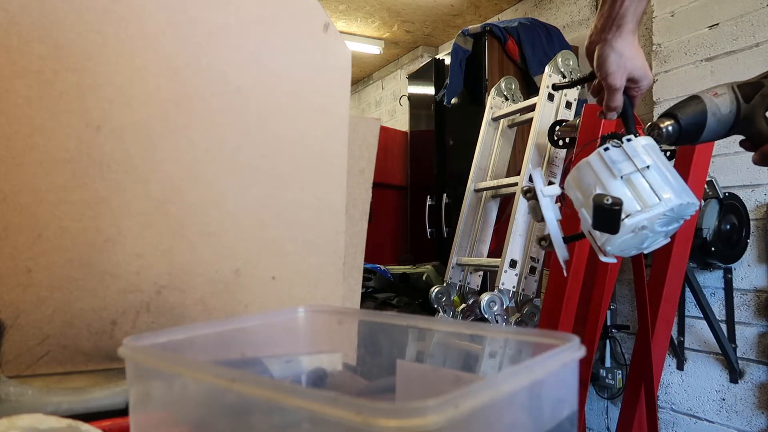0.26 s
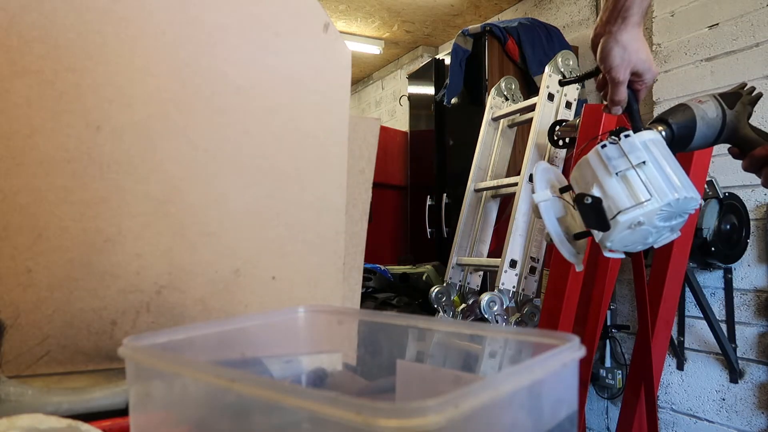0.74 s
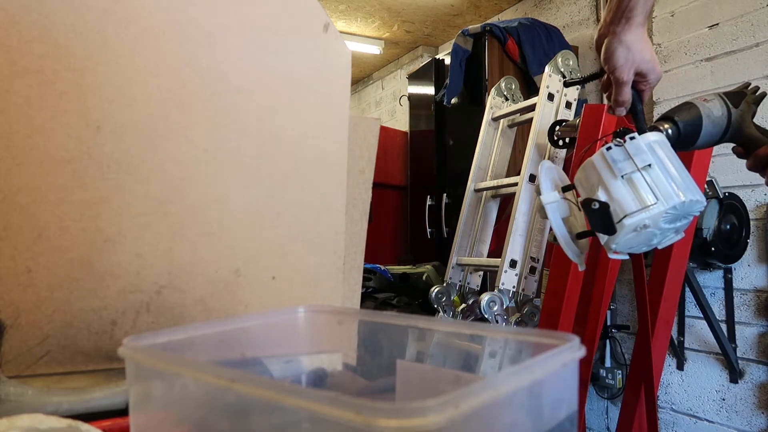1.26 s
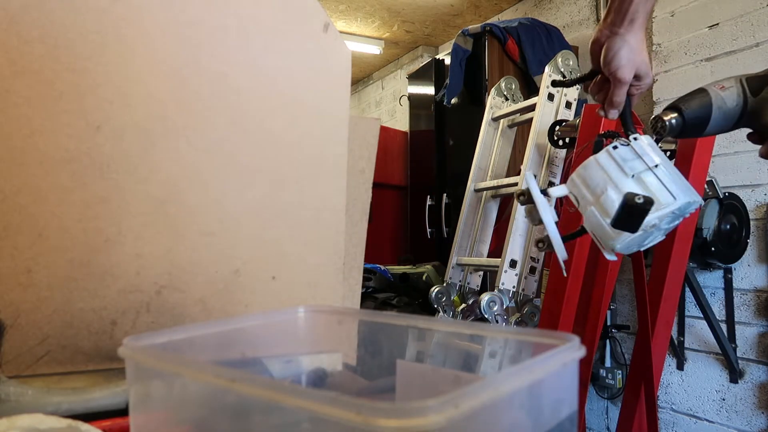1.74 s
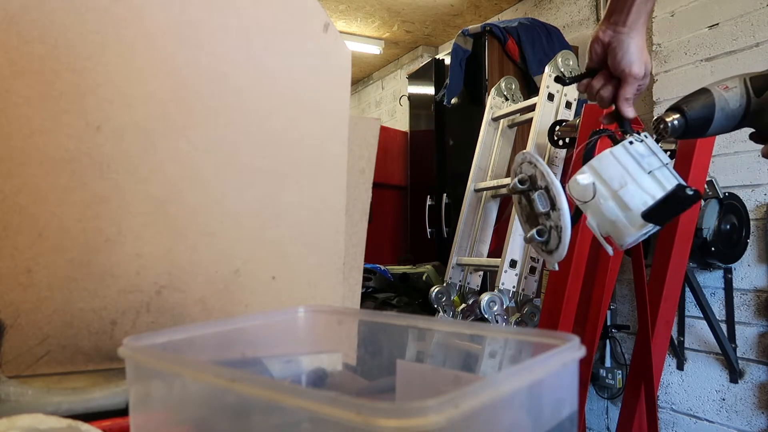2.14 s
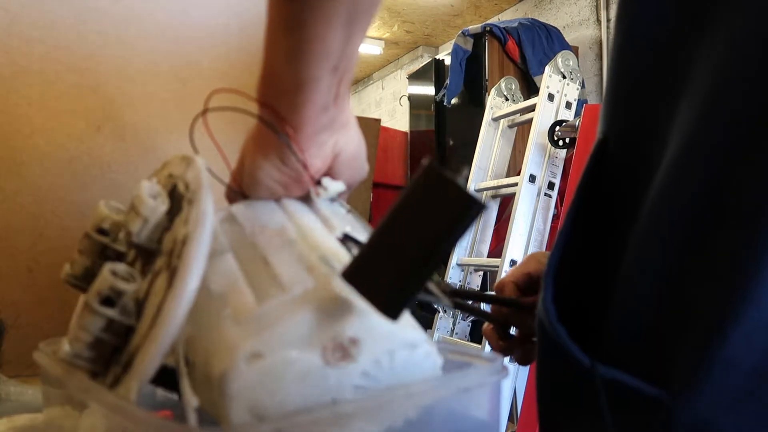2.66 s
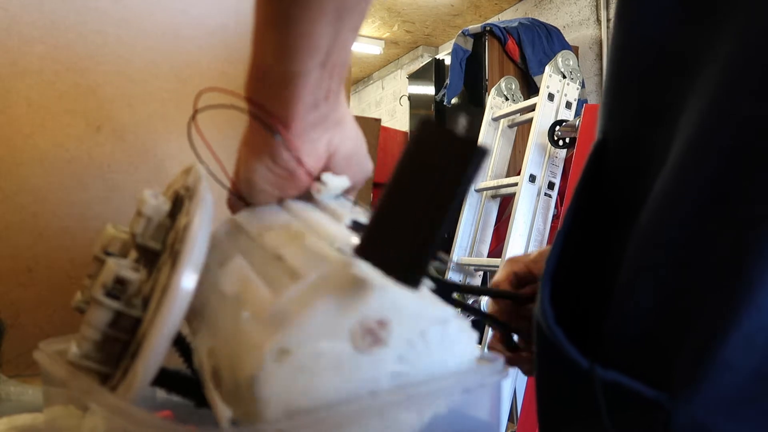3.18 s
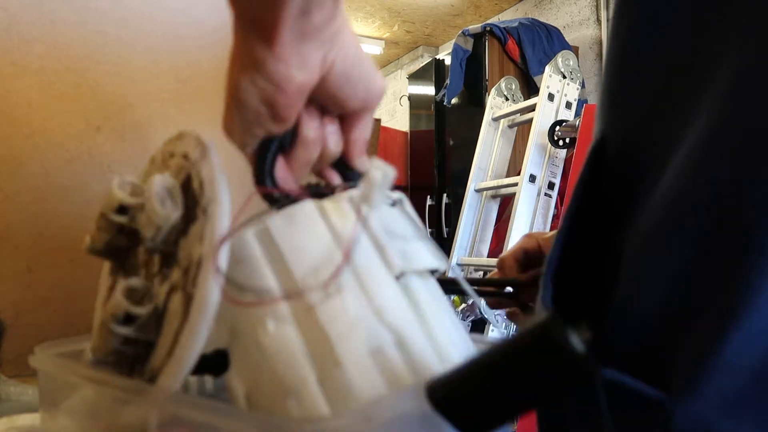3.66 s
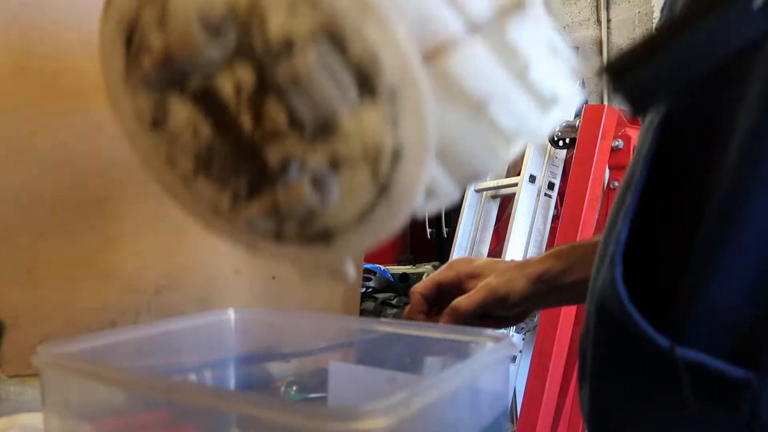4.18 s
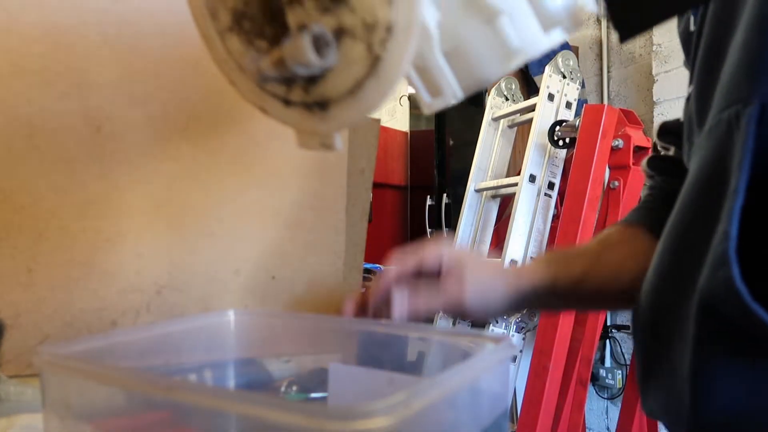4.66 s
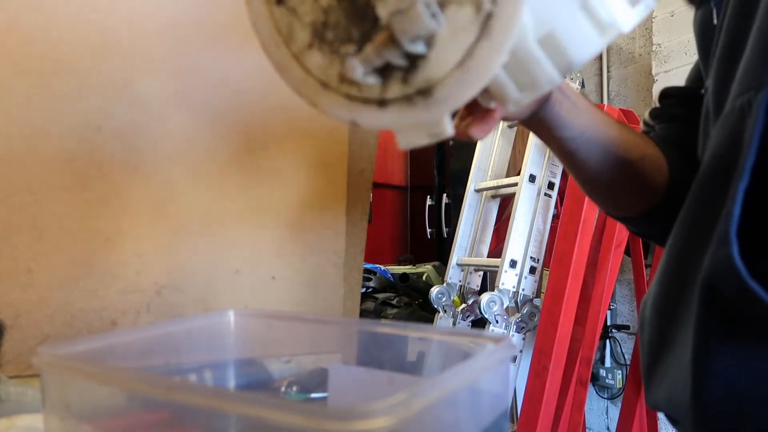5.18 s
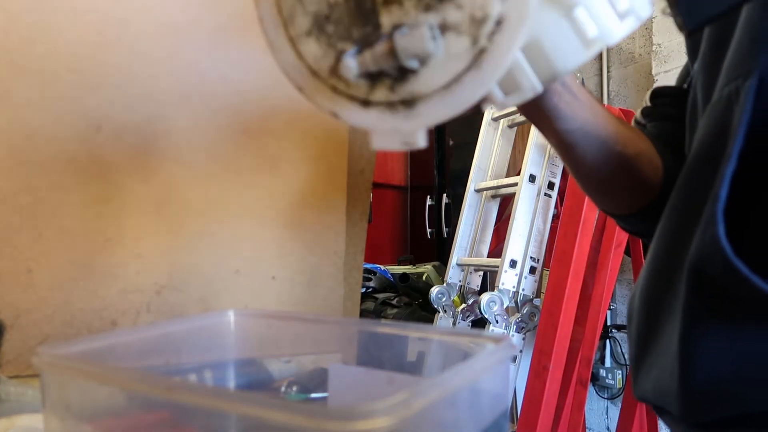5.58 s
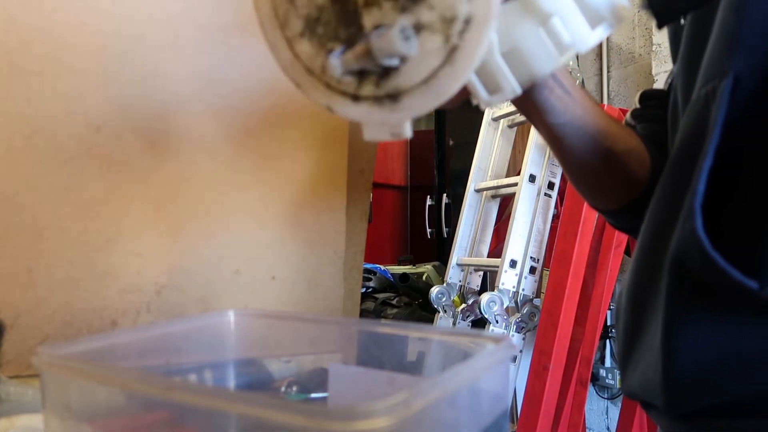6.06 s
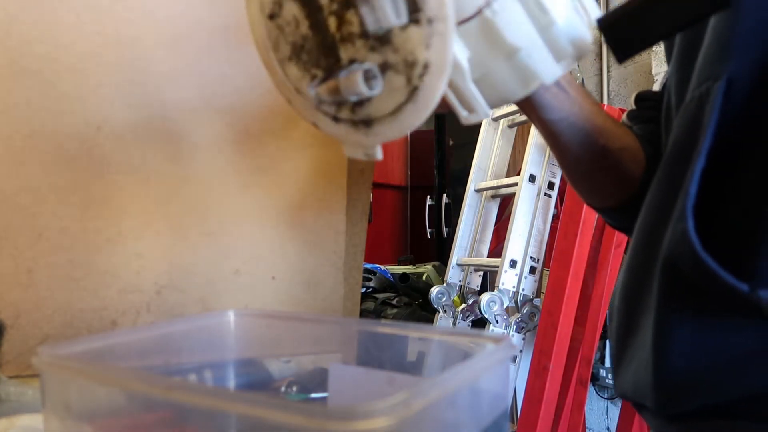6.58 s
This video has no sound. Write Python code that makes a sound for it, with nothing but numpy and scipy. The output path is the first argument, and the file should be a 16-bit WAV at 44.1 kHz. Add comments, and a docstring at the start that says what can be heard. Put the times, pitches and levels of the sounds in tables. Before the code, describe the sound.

From 0 to about 2.3 seconds a heat gun blows steadily: mid-heavy turbulent air coloured by nozzle resonances, with a thin, slightly wavering fan whine. It stops instantly with a hard cut. Immediately a hollow plastic part is handled in a plastic tub close to the stereo microphone: soft knocks and clicks from 2.4 to 3.2, then firmer thumps and scrapes around 3.3 to 3.4. Sharp clacks at 3.7 and 3.8 lead to the heaviest boomy thumps, with dragging, near 3.9 to 4.0. A quieter gap follows, then hollow knocks at 4.4 and 4.5 and a bright scrape with a bump near 4.65. After 4.9 the part is out of the tub: faint, irregular clicks, small rattles and finger rubs over low background noise. Hiss rises slightly at 6.6, and a tiny crisp snap comes at 6.8. The room is small and dry.

```python
"""In a garage, a heat gun blows until a cut; then a hollow plastic part is knocked, clicked and dragged about
in a plastic tub close to a two-port microphone, and fingered more quietly in the air.
The gun is turbulent noise filtered by nozzle resonances, over a thin harmonic blade whine.
Blows are noise bursts and decaying tub modes; rubbing is stick-slip grains driving tub and part.
A small dry room answers the handling; background noise and hiss lie beneath."""
import sys
import numpy as np
from scipy import signal
from scipy.fft import rfft, irfft, next_fast_len
from scipy.io import wavfile
from scipy.ndimage import uniform_filter1d

SR = 44100
rng = np.random.default_rng(int(sys.argv[2]) if len(sys.argv) > 2 else 0)


def nominal_scale(level):
    """Amplitude ratio for a level in decibels (scalar or array-like)."""
    x = np.asarray(level, float) / 20
    return 10 ** x


def wav_out(sig):
    """Save sig, one row per channel (or a flat mono array), as 16-bit PCM at SR to the path in sys.argv[1]."""
    wavfile.write(sys.argv[1], SR, np.round(np.clip(np.atleast_2d(sig).T, -1, 1) * 32767).astype(np.int16))


N = 301192
SIZE = next_fast_len(N + SR)
HZ = np.arange(SIZE // 2 + 1) * SR / SIZE
TIME = np.arange(N) / SR
GUN_CUT_S = 2.294
# the hollow ring is higher once the part is out of the tub
HOLLOW_HZ, LIFTED_S, LIFTED_HOLLOW_HZ = 658, 4.9, 719


def level(x, db):
    """Root-mean-square normalisation: scale a signal to an rms level."""
    return x * nominal_scale(db) / np.sqrt(np.mean(x ** 2))


def curve(table):
    """Linear interpolation: join each column of a table over time."""
    s, *columns = np.transpose(table)
    return [np.interp(TIME, s, c) for c in columns]


def colour(points, peaks=()):
    """Spectral envelope: gain through points (frequency [Hz], level [dB]), lifted at resonances."""
    hz, db = np.transpose(points)
    db = np.interp(np.log(HZ + 1), np.log(hz), db)
    lift = sum(lift_db / (1 + (2 * (HZ - f) / width) ** 2) for f, width, lift_db in peaks)
    return nominal_scale(db + lift)


def shape(x, gain):
    """Linear filtering: multiply the spectrum by a gain over frequency."""
    return irfft(rfft(x, SIZE) * gain, SIZE)[..., :N]


def band(x, lo_hz, hi_hz):
    """Band-pass filtering: gentle second-order Butterworth slopes."""
    sos = signal.butter(2, [lo_hz, min(hi_hz, .45 * SR)], "band", fs=SR, output="sos")
    return signal.sosfilt(sos, x)


def walk(rate):
    """Slow random modulation: levels held 1 / rate s, smoothed twice, with a spread of 1."""
    hold = int(SR / rate)
    held = np.repeat(rng.standard_normal(N // hold + 1), hold)
    x = uniform_filter1d(uniform_filter1d(held, hold), hold)[:N]
    return x / np.std(x)


def add(out, s, x):
    """Superposition: mix a sound in at a time."""
    out[int(s * SR):int(s * SR) + len(x)] += x


# mean level of the air: (time [s], level [dB])
AIR_LEVEL = [(0.0, -43), (0.4, -42.5), (0.9, -42.5), (2.28, -42)]
# relative spectrum of the turbulence: (frequency [Hz], density [dB per Hz])
AIR_SPECTRUM = [(18, -68), (30, -29.5), (247, -7), (404, -19), (859, -10.5), (1170, -15), (1830, -5.5),
                (2030, -9.5), (2770, -14), (5170, -27), (7240, -39), (9890, -50.5), (13000, -54),
                (15000, -81)]
# nozzle resonances: (frequency [Hz], width [Hz], lift over the air [dB])
NOZZLE_RESONANCES = [(210.3, 15, 6), (275, 40, 6.5), (542, 71, 4.5), (718, 9.2, 6), (883, 9.2, 11),
                     (1080, 35, 12), (1256.5, 22, 11), (1420, 15, -4.5), (1705, 42, 1), (1694, 45, 10.5),
                     (1871, 62, 8), (2210, 28, 5.5), (2357, 60, 6.5), (2700, 69, 9.5), (2887, 30, 14.5),
                     (3450, 62, 5.5), (3585, 85, 10.5), (3800, 57, 7.5), (4824, 130, 10), (5170, 52, 9.5),
                     (5900, 360, 4), (6340, 170, 7), (7060, 160, 12), (9110, 36, 17)]
# relative spectrum of the side, before the nozzle: (frequency [Hz], density [dB per Hz])
AIR_SIDE_SPECTRUM = [(60, -59), (420, -4), (820, -16), (1080, -6), (1270, -8.5), (1750, -3), (2830, 0),
                     (5100, -7), (5400, -9.5), (8000, -15.5), (12000, -16), (12600, -25), (14300, -35),
                     (14700, -60)]
# blade harmonics: (multiple of the blade rate [1], mean rms level in the mid [dB])
WHINE_HARMONICS = [(2, -57), (3, -64), (6, -77)]
BLADE_HZ = 888.9
GUN_SIDE_DB = -11.5  # unrelated eddies in the side, under the mid
GUN_LEAN = -0.024  # share of the mid in the side: the air stands a little to the right


def gun():
    """Source and filter: turbulence excites nozzle resonances, with harmonics of a wavering blade rate."""
    mid = level(shape(rng.standard_normal(N), colour(AIR_SPECTRUM, NOZZLE_RESONANCES)), 0)
    # the nozzle marks the side less strongly
    side_nozzle = colour([(20, 0.014), (2e4, 0.0036)], NOZZLE_RESONANCES) ** .6
    eddies = shape(rng.standard_normal(N), colour(AIR_SIDE_SPECTRUM) * side_nozzle)
    side = level(eddies, GUN_SIDE_DB) + GUN_LEAN * mid
    air = np.array([mid, side]) * nominal_scale(curve(AIR_LEVEL)[0] + 0.69 * walk(11.2))
    phase = 2 * np.pi * np.cumsum(BLADE_HZ * (1 + 0.0009 * walk(3.95))) / SR
    whine = sum(np.sqrt(2) * nominal_scale(db + 4.5 * walk(13.7)) * np.sin(k * phase) for k, db in WHINE_HARMONICS)
    before_cut = np.clip((GUN_CUT_S - TIME) / 0.00034, 0, 1)
    return before_cut * (air + whine * np.array([[1], [.15]]))


# relative spectrum of the background, mid: (frequency [Hz], density [dB per Hz])
BACKGROUND_SPECTRUM = [(25, -2.5), (90, 0.5), (300, -6.5), (700, -9.5), (1500, -17.5), (3000, -18.5),
                       (6000, -29), (10000, -37), (13000, -42), (15000, -63)]
# relative spectrum of the background, side: (frequency [Hz], density [dB per Hz])
BACKGROUND_SIDE_SPECTRUM = [(25, -27), (200, 0), (500, 1), (1800, -7), (5000, -13), (10000, -22.5),
                            (12400, -23), (13200, -32), (15500, -46.5)]
# background level, which dips after the loud blows and recovers: (time [s], change [dB])
BACKGROUND_LEVEL = [(0, 3), (2.3, 1), (3.9, 2.5), (4.1, -14.5), (4.9, -9.5), (5.5, -4.5), (6.0, 0.5),
                    (6.83, -0.5)]
# treble hiss that steps up near the end: (time [s], rms level [dB])
HISS_ONSET = (6.61, -79)
BACKGROUND_DB, BACKGROUND_SIDE_DB = -67, -73.5  # rms before the change of level


def background():
    """Noise with a slowly changing level: a faint background, and microphone hiss."""
    noise = rng.standard_normal((4, N))
    mid = level(shape(noise[0], colour(BACKGROUND_SPECTRUM)), BACKGROUND_DB)
    side = level(shape(noise[1], colour(BACKGROUND_SIDE_SPECTRUM)), BACKGROUND_SIDE_DB)
    hiss_s, hiss_db = HISS_ONSET
    hiss = level(band(noise[2:], 3000, 16000), hiss_db) * (TIME > hiss_s)
    return np.array([mid, side]) * nominal_scale(curve(BACKGROUND_LEVEL)[0] + 0.69 * walk(5.8)) + hiss


# modes of the tub, before shift and damping: (frequency [Hz], relative level [dB], decay by 60 dB [s])
TUB_MODES = [(90.5, -18, .15), (148, -5, 0.23), (167.3, -2, 0.27), (226, -4.5, 0.14), (284.6, 0, 0.18),
             (336.5, -2.5, 0.075), (439, -1, 0.19), (465.4, 4, 0.2), (596.8, -5.5, 0.24), (679, -4, 0.14),
             (886, 3.5, 0.099), (934, -1.5, 0.08)]


def tub_ring(near_hz, chance, push_s, damp_db=0, octaves=0.39, size=SR // 3):
    """Modal synthesis: a rounded push rings modes near the struck pitch most; the grip shifts and damps them."""
    t = np.arange(size) / SR
    hz, db, t60 = np.transpose(TUB_MODES)
    nearness = 1 / (1 + (np.log2(hz / near_hz) / octaves) ** 2)
    gains = np.sign(chance[0]) * nominal_scale(db + 3.8 * chance[0]) * nearness
    hz = hz * (1 + 0.005 * chance[1])
    decays = np.exp(-np.log(1000) * np.outer(nominal_scale(damp_db) / t60, t))
    modes = decays * np.sin(2 * np.pi * np.outer(hz, t))
    ring = np.convolve(gains @ modes, np.hanning(int(push_s * SR) + 3))[:len(t)]
    return ring / np.abs(ring).max()


def grains(rate, spread_db):
    """Stick-slip: sparse slips of random sign and very uneven size, rate per second."""
    chance = rng.random((3, N))
    sizes = nominal_scale(-spread_db * np.log(1 - chance[2]))
    return (chance[0] < rate / SR) * np.sign(chance[1] - .5) * sizes


def swells(rows, rise_share):
    """Addition of powers: scratch, hollow ring and treble of each row swell to a peak and fade."""
    power = np.zeros((3, N + SR))
    for s, fade_s, db, hollow_db, treble_db in rows:
        rise_s = rise_share * fade_s
        t = np.arange(-2 * rise_s, 2 * fade_s, 1 / SR)
        roundness = 1.4
        shape_db = -20 * np.where(t < 0, -t / (rise_s + 1e-9), t / fade_s) ** roundness
        for layer, over_db in zip(power, (0, hollow_db, treble_db)):
            add(layer, s - 2 * rise_s, nominal_scale(2 * (db + over_db + shape_db)))
    return power[:, :N]


def drag(near_hz, db, gain, octaves=.42):
    """Forced resonance: soft slips ring the tub around one pitch, coming and going."""
    chance = np.ones((2, len(TUB_MODES))) * [[1], [0]]  # modes left unshifted
    ring = band(tub_ring(near_hz, chance, 0.0009, 11.0, octaves), near_hz * 0.76, near_hz * 1.685)
    slips = level(grains(400, 1.38), 0) * gain * nominal_scale(db + 2.74 * walk(20))
    return shape(slips, rfft(ring / np.sqrt(np.sum(ring ** 2)), SIZE))


# weight of the part on the tub, rumble before its later trims:
# (time [s], tub rumble [dB], shake of the microphone [dB])
CONTACT_WEIGHT = [(2.3, -58, -59), (2.62, -53, -57), (2.77, -56.5, -69), (2.86, -40, -47.5),
                  (2.97, -57, -59), (3.11, -44, -46), (3.23, -50, -49.5), (3.44, -31, -43.5),
                  (3.55, -46, -54.5), (3.72, -33, -47.5), (3.93, -32, -44), (4.09, -52.5, -50),
                  (4.4, -71, -75.5), (4.58, -49.5, -59), (4.69, -37, -51), (4.82, -60, -57.5),
                  (4.9, -69, -62.5), (5.44, -78, -84.5), (6.4, -69.5, -71.5), (6.83, -70, -57)]
# after a thump the part slides on: rumble under the thump, time to fade by 20 dB, shake under the rumble
SLIDE_DB, SLIDE_S, SLIDE_SHAKE_DB = -10, 0.08, -17.5


def contact():
    """Contact load: gains of rumble and shake, the steady weight and the slide after each thump adding in power."""
    rows = [(s, SLIDE_S, db + SLIDE_DB, SLIDE_SHAKE_DB, 0) for s, db, hz, damp_db in TUB_THUMPS]
    return np.sqrt(nominal_scale(curve(CONTACT_WEIGHT)) ** 2 + swells(rows, 0)[:2])


# scrapes and finger rubs, before the common rub trim; rows with no positive fade are silent:
# (time of the peak [s], fade by 20 dB [s], scratch [dB], hollow ring over scratch [dB], treble over scratch [dB])
FRICTION_SCRAPES = [(2.31, 0.13, -75, 17, -11), (2.424, 0.16, -61.5, 1.5, -4),
                    (2.528, -0.04, -60, 15.5, -9), (2.67, .12, -66.5, 8.5, -15.5),
                    (2.83, 0.02, -44.5, 3.5, -12.5), (2.922, 0.23, -52, 2.5, -29), (3.0, 1.5, -68, 0, -7),
                    (3.065, 0, -49.5, -2, -30), (3.17, 0.04, -46, 3, -29), (3.36, 0.27, -42, -7, -18),
                    (3.44, .075, -38.5, -3.5, -27), (3.6, 0, -51.5, 8, -8), (3.67, .1, -47, 0, -32),
                    (3.735, 0.23, -37.5, 2.5, -17.5), (3.82, 0.08, -41.5, 3, -35),
                    (3.921, 0.0552, -34, -4.5, -22), (4.065, -0.1, -64, 1, -27),
                    (4.215, 0.17, -62.5, -20, -7.5), (4.41, -0.06, -59.5, -19, -10),
                    (4.55, -0.0031, -43, 9, -30), (4.658, 0.0259, -29, -3.5, 0), (4.74, .07, -67, 3, -9),
                    (4.96, .09, -65.5, 2.5, -19), (5.125, .045, -49.5, -6, -15), (5.2, .13, -65.5, -2, -24),
                    (5.31, .03, -61, 0, -11), (5.415, .035, -59.5, -1, -35), (5.56, .12, -58, -28, -30),
                    (5.63, .09, -54, -24, -23), (5.745, .1, -56, -1, -31), (6.0, .14, -66.5, -10, -14.5),
                    (6.16, .05, -63.5, -3, -5.5), (6.26, .07, -60, -5, -17), (6.398, .14, -67, -8, -2),
                    (6.71, .13, -53.5, -1.5, -21), (6.802, .035, -56.5, -12, -7)]
# a skid follows each listed click: level under the click, length over its rattle
SKID_DB, SKID_STRETCH = -6.5, 2.16
SKID_HOLLOW_DB, SKID_TREBLE_DB = 4, -20.5  # hollow over the click's ring share, treble over the scratch


def scrapes():
    """Sliding friction: gains of scratch, hollow ring and treble; each swells faster than it fades."""
    skids = [(s, SKID_STRETCH * ms / 1000, db + SKID_DB, ring_db + SKID_HOLLOW_DB, SKID_TREBLE_DB)
             for s, db, hz, ring_db, ms in PART_CLICKS]
    return np.sqrt(swells(FRICTION_SCRAPES, 0.55) + swells(skids, 0.12))


# where the drag excites the tub, before a 1.5 dB trim: (frequency [Hz], relative level [dB])
DRAG_PITCHES = [(152, 0.5), (225, -6), (285, 0.5)]


def rumble(weight, hollow):
    """Forced resonance: slips drive the tub at low pitches and the hollow ring."""
    low = sum(drag(hz, db - 1.5, weight) for hz, db in DRAG_PITCHES)
    in_tub = drag(HOLLOW_HZ, 0, hollow * (TIME < LIFTED_S), 0.18)
    in_air = drag(LIFTED_HOLLOW_HZ, 0, hollow * (TIME >= LIFTED_S), .16)
    return low + in_tub + in_air


# relative spectrum of rubbed plastic: (frequency [Hz], density [dB per Hz])
PLASTIC_SPECTRUM = [(500, -25), (900, -6.5), (1300, -5.5), (2500, -6), (3300, -12.5), (5000, -26.5),
                    (10000, -33), (15000, -62.5)]
# resonances of the part, as lifts of the scratch: (frequency [Hz], width [Hz], lift [dB])
PART_RESONANCES = [(1282, 33, 7.5), (1545, 730, 8), (2160, 75, 5), (2480, 620, 3.5), (2900, 100, 1.5),
                   (3660, 120, 2.5)]


def scratch(gain, treble):
    """Stick-slip: clustered slips, with gaps between, excite the part's resonances and a treble band."""
    slips = grains(3000, 3.0) * nominal_scale(4.5 * walk(60))
    body = level(shape(slips, colour(PLASTIC_SPECTRUM, PART_RESONANCES)), 0)
    return body * gain + level(band(slips, 5000, 9600), 0) * treble


def rubbing():
    """Friction-driven vibration: slips drive tub and part; the microphone itself is shaken in the bass."""
    weight, shaking = contact()
    gain, hollow, treble = scrapes()
    shake = level(band(band(rng.standard_normal(N), 30, 120), 30, 120), 0) * shaking
    # the slips carry less than the blows above them
    return nominal_scale(-4.5) * (rumble(weight, hollow) + scratch(gain, treble)) + shake


# thumps against the tub: (time [s], peak level before the room [dB], pitch struck most [Hz], damping by the grip [dB])
TUB_THUMPS = [(2.37, -46, 145, 9), (2.414, -36.5, 210, 12), (2.504, -32, 262, 2), (2.799, -29.5, 247, 7),
              (2.91, -39, 469.4, 1.5), (2.985, -42, 140, 2), (3.043, -33.5, 250, 3), (3.07, -31.5, 290, 4),
              (3.254, -34.5, 262, 0), (3.306, -24, 275, 5), (3.341, -29, 154, 10.5), (3.386, -25.5, 154, 4),
              (3.597, -35.5, 159, 5), (3.811, -24, 153, 2), (3.874, -25.5, 140, 8.5),
              (3.925, -14, 223, 7.5), (3.979, -17, 302, 2.5), (4.148, -37.5, 153, 13),
              (4.279, -41.5, 162, 4.5), (4.368, -55, 164, 0), (4.436, -27.5, 148, 2), (4.512, -17, 225, 8),
              (4.649, -23, 275, 2.5), (4.685, -30, 165, -1), (4.943, -52, 164, -3)]


def thumps():
    """Impact excitation: each thump rings the low modes of the tub."""
    out = np.zeros(N + SR)
    for s, db, hz, damp_db in TUB_THUMPS:
        chance = rng.standard_normal((2, len(TUB_MODES)))
        add(out, s, nominal_scale(db) * tub_ring(hz, chance, 0.002, damp_db))
    return out[:N]


def fidget():
    """Random arrivals: rows of faint clicks scattered over the handling, columns as the part's clicks."""
    count, lowest_db, spread_db, rattle_ms = 26, -64, 2.5, 13
    when, size, pitch = rng.random((count, 3)).T
    times = GUN_CUT_S + when * (N / SR - GUN_CUT_S)
    levels = lowest_db - spread_db * np.log(1 - size)
    return [(s, db, 950 * 2.47 ** p, -10, rattle_ms) for s, db, p in zip(times, levels, pitch)]


# clicks of the part: (time [s], body peak before walls and room [dB], pitch [Hz],
# hollow ring over click before its band-pass [dB], rattle length [ms])
PART_CLICKS = [(2.3911, -50, 3250, 0, 7.6), (2.4136, -40.5, 1030, -12, 7.2),
               (2.5034, -37.5, 2170, -0.5, 9.9), (2.5987, -34, 2190, -11, 5.7), (2.6605, -55, 1900, 6, 12),
               (2.7124, -49, 2200, -15, 5.9), (2.7992, -36, 1070, -7, 15.6), (2.8187, -38, 1720, 2, 17),
               (2.9129, -46, 1910, -19, 9.1), (2.9878, -57, 1100, 11, 7.7), (3.0327, -53, 1400, -10, 27),
               (3.0576, -43.5, 1090, -8, 13), (3.1185, -53, 1120, -2, 17), (3.1404, -47.5, 1090, -6, 26),
               (3.1644, -42.5, 2140, 3.5, 15), (3.2068, -43.5, 2460, -3, 9.8),
               (3.2582, -27.5, 1870, -8, 14.7), (3.306, -31, 1330, 0, 18), (3.3739, -38, 1110, 1.5, 45),
               (3.4397, -42.5, 1310, 6, 18), (3.5844, -42.5, 2090, 1.5, 9.2),
               (3.6533, -48.5, 1230, 10, 8.8), (3.7021, -17.5, 2120, -10.5, 9.8),
               (3.756, -27, 890, -9.5, 7.1), (3.7825, -19.5, 1900, -3, 12.6), (3.8328, -35, 920, -12.5, 11),
               (3.8663, -30.5, 1300, -17, 18), (3.9246, -33.5, 2300, -3, 6), (3.9436, -32, 2920, -15.5, 13),
               (3.9805, -22.5, 1230, 1, 6.6), (4.0783, -35.5, 1200, -19, 8.9),
               (4.1466, -54.5, 1060, 8, 6.2), (4.1811, -53, 2600, -13, 7.5), (4.207, -54.5, 1490, -21, 12),
               (4.219, -45, 2570, -18, 12), (4.2803, -58.5, 944, 2, 8.4), (4.3996, -49.5, 1340, -21, 13),
               (4.444, -50, 1500, 4.5, 13), (4.5138, -25.5, 1480, -3.5, 6.4),
               (4.6455, -26.5, 1080, -25, 23), (4.6535, -28, 1760, -10, 14),
               (4.8884, -61.5, 2500, -26, 8.6), (4.9358, -50.5, 2440, -1.5, 20),
               (5.0635, -62, 2410, -8, 40), (5.105, -43.5, 890, -3, 24.4), (5.1324, -47, 2480, -15, 21),
               (5.2147, -57.5, 2460, -5, 11), (5.2481, -46, 2240, -2, 7.3), (5.2845, -46, 1800, -2.5, 9.6),
               (5.3559, -49, 890, 3, 10), (5.4113, -59.5, 1420, -9, 6.6), (5.5405, -54, 1950, -26, 9.3),
               (5.5724, -57, 2100, -21, 17), (5.609, -45, 3720, -22, 15.3), (5.6677, -50.5, 2020, -26, 13),
               (5.7051, -46.5, 1810, -5.5, 39), (5.8313, -55.5, 2390, -13, 14.6),
               (5.958, -57.5, 1730, -8, 12), (5.9949, -57.5, 2500, -17, 9.3), (6.1097, -43, 2330, -19, 16),
               (6.1631, -56, 1520, -20, 6.6), (6.2114, -44.5, 2610, -14, 6), (6.2444, -45, 2660, -22, 25),
               (6.4, -50.5, 935, -24, 8.9), (6.6923, -50, 1440, 4.5, 13.4), (6.7582, -47, 915, 4, 15)]
CLICK_RISE_S = .0003
TICK_DB = -21  # treble tick under the click


def clicks():
    """Impact noise: bursts crack and rattle around their pitch, tick in the treble and ring the hollow and walls."""
    cracks, rings = np.zeros((2, N + SR))
    t = np.arange(SR // 6) / SR
    for s, db, hz, ring_db, ms in PART_CLICKS + fidget():
        noise, chance = rng.standard_normal(len(t)), rng.standard_normal((2, len(TUB_MODES)))
        # the parts bounce every millisecond or two while the rattle lasts
        bounces = nominal_scale(6.0 * np.repeat(rng.standard_normal(len(t) // 60 + 1), 60)[:len(t)])
        rattle = bounces * np.exp(-(t * 1000 / ms) ** 1.07)
        crack = 3.44 * np.exp(-t / 0.00087)
        burst = noise * (1 - np.exp(-t / CLICK_RISE_S)) * (rattle + crack)
        body = band(burst, hz * 0.903, hz * 1.202) * 2.17 + band(burst, hz * 1.015, max(hz * 1.71, 3500))
        tick = band(burst, 2900, 13000)
        add(cracks, s, nominal_scale(db) * (body / np.abs(body).max() + nominal_scale(TICK_DB) * tick / np.abs(tick).max()))
        hollow_hz = HOLLOW_HZ if s < LIFTED_S else LIFTED_HOLLOW_HZ
        ring = tub_ring(hollow_hz, chance, 0.00057, 8.9, 0.26, size=len(t))
        add(rings, s, nominal_scale(db + ring_db) * band(ring, hollow_hz * 0.68, hollow_hz * 1.9))
    # every click also sets the walls of the part ringing briefly
    walls = sum(nominal_scale(db - 11.5) * band(cracks, hz - width / 2, hz + width / 2)
                for hz, width, db in PART_RESONANCES)
    return (cracks + walls + rings)[:N]


# a lone bright snap: (time [s], peak level before the room [dB], low edge [Hz], high edge [Hz], decay constant [ms])
BRIGHT_SNAP = (6.7961, -31, 5500, 11500, .4)


def snap():
    """Transient noise: one very short band-limited burst."""
    s, db, lo_hz, hi_hz, ms = BRIGHT_SNAP
    out = np.zeros(N + SR)
    t = np.arange(SR // 6) / SR
    burst = band(rng.standard_normal(len(t)) * np.exp(-t * 1000 / ms), lo_hz, hi_hz)
    add(out, s, nominal_scale(db) * burst / np.abs(burst).max())
    return out[:N]


# spectrum of the side reflections, before the ports: (frequency [Hz], side minus mid [dB])
SIDE_REFLECTIONS = [(60, -49), (200, -43.5), (400, -19), (800, -20), (1600, -19.5), (3000, -11.5),
                    (5000, -1), (8000, 3.5), (11000, 11.5), (13000, 7), (15000, -0.5)]
# the summed microphone ports lose treble: (frequency [Hz], gain [dB])
PORT_RESPONSE = [(20, -12), (40, -5), (60, -1.5), (5000, 0.5), (8000, -8.5), (11000, -11.5), (13000, -5.5),
                 (16000, -55.5)]
ROOM_T60_S, ROOM_DB = 0.16, -8.5  # tail before its band-pass, under the direct sound


def room(x):
    """Reverberant decay: direct sound and short tail in the mid; other, treble-leaning reflections in the side."""
    t = np.arange(SR // 2) / SR
    tails = rng.standard_normal((2, len(t))) * np.exp(-np.log(1000) * t / ROOM_T60_S) * (t > .002)
    tails /= np.sqrt(np.sum(tails ** 2, axis=1, keepdims=True))
    early = rng.standard_normal(len(t)) * np.exp(-t / 0.0013)
    early /= np.sqrt(np.sum(early ** 2))
    mid = 1 + nominal_scale(ROOM_DB) * rfft(band(tails[0], 700, 18000), SIZE)
    side = (rfft(early, SIZE) + nominal_scale(-13.0) * rfft(tails[1], SIZE)) * colour(SIDE_REFLECTIONS)
    return shape(x, np.array([mid, side]) * colour(PORT_RESPONSE))


def scene():
    """Superposition: mid and side of all sources, turned into left and right."""
    handling = room(rubbing() + thumps() + clicks() + snap()) * (TIME > GUN_CUT_S)
    mid, side = gun() + background() + handling
    return np.array([mid + side, mid - side])


def low_pass(x):
    """Removes everything above the highest recorded frequency."""
    return signal.sosfilt(signal.butter(12, 15670, fs=SR, output="sos"), x)


def record(dry):
    """Signal chain: the finished stereo mix passes through one last stage."""
    return low_pass(dry)


dry = scene()
out = record(dry)
wav_out(out)
```